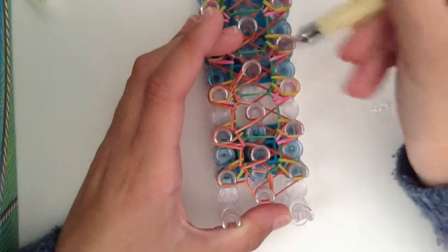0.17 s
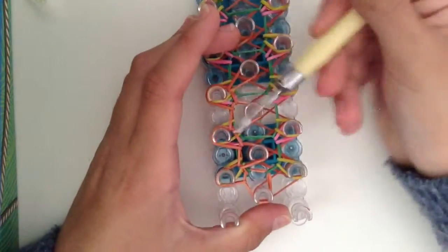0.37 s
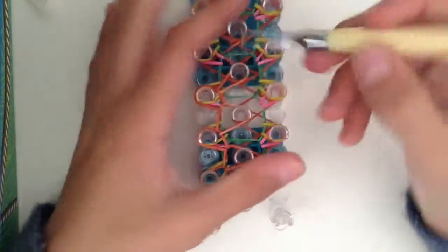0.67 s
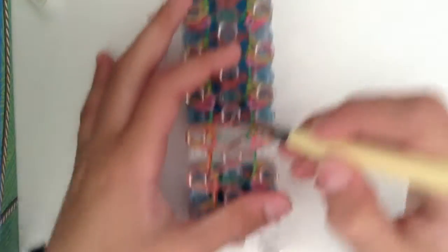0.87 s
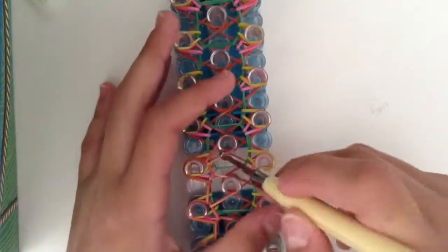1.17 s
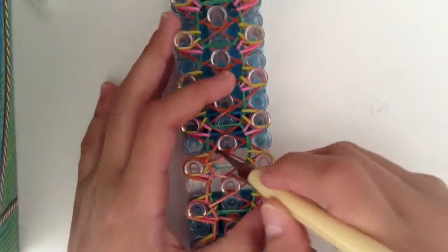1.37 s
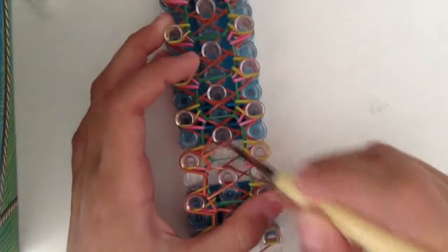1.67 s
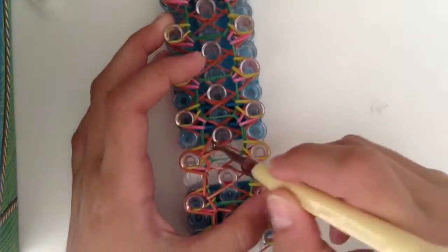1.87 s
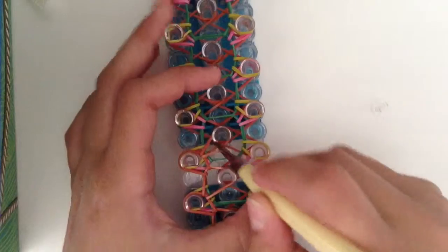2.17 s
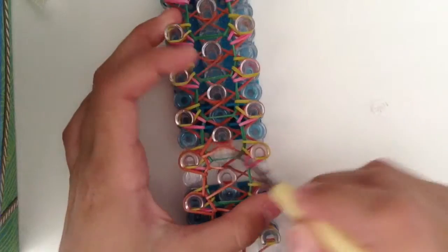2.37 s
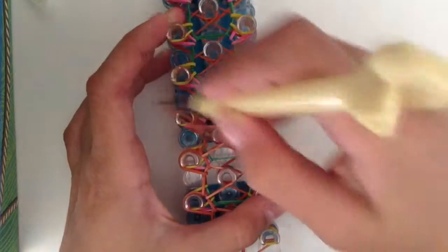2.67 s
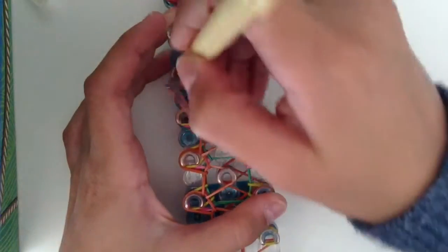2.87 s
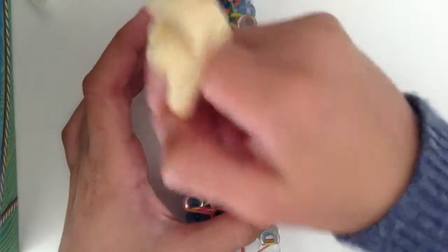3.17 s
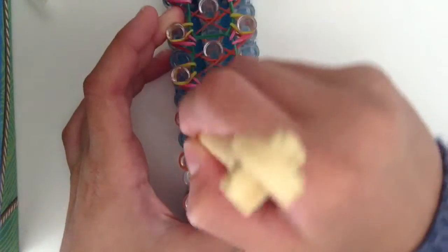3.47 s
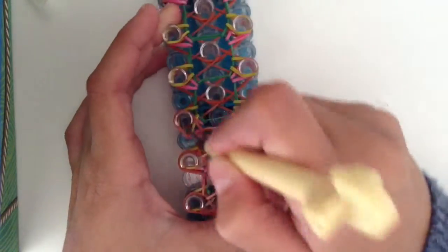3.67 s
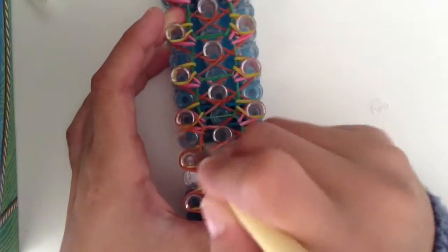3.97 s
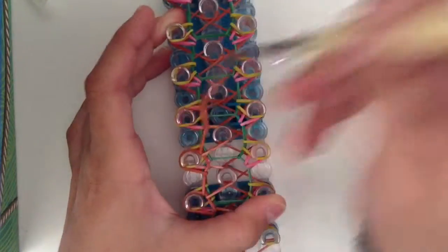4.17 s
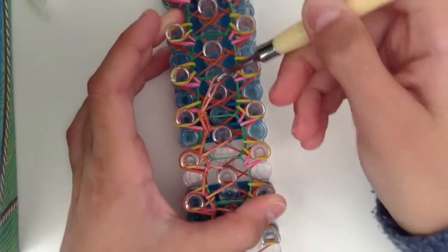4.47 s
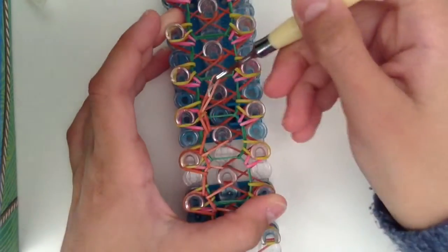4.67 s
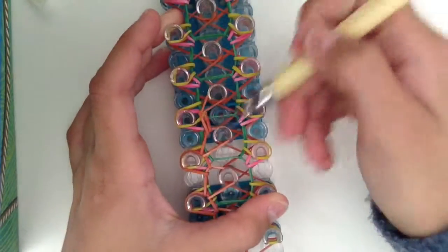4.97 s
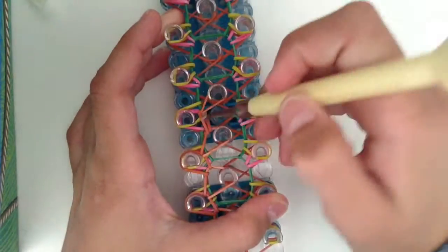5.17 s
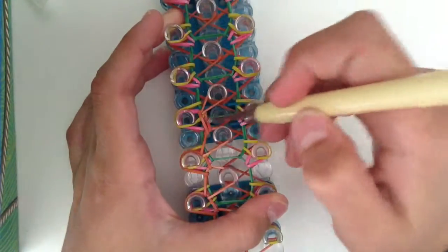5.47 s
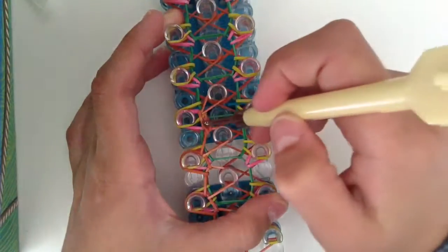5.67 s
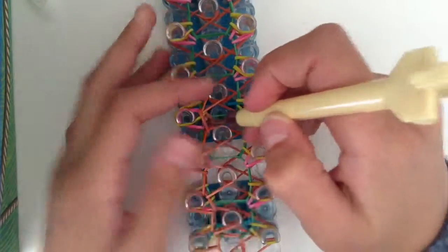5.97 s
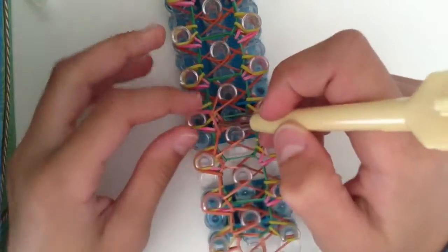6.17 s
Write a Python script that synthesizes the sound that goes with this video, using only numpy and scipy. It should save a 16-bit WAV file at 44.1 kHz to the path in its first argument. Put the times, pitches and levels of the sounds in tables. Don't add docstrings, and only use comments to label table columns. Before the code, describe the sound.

Scattered crisp plastic clicks and small table knocks as a metal hook works bands on a plastic loom, with one early uneven scrape.

```python
import sys
import numpy as np
from scipy import signal
from scipy.fft import rfft, irfft
from scipy.io import wavfile

SR = 44100
rng = np.random.default_rng(int(sys.argv[2]) if len(sys.argv) > 2 else 0)


def how_loud(loudness_db):
    steps = np.asarray(loudness_db, float) / 20
    return 10 ** steps


def materialize(psi):
    bounded = np.clip(np.atleast_2d(psi).T, -1, 1)
    quanta = np.round(bounded * 32767).astype(np.int16)
    wavfile.write(sys.argv[1], SR, quanta)


N = 278712

# pitch_hz [Hz], level_db [dB], fade by 60 dB t60_s [s]
TABLE_TONES = [(126, -30, 0.051), (177.6, -7, 0.4), (237.4, -15, 0.65), (297.3, -2, 0.17),
               (350, -2.5, 0.12), (380, 2, 0.1), (485.5, 5, 0.074), (523, -16, 0.088), (626, -6.5, 0.092),
               (665, -0.5, 0.12), (746, -4.5, 0.027), (783.5, 3, 0.064), (825.4, -1.5, 0.092)]
# pitch_hz [Hz], level_db [dB], t60_s [s]
FRAME_TONES = [(980, -5.5, 0.07), (1050, -6, 0.13), (1150, -7.5, 0.06), (1150, -5, 0.032), (1335, 3, 0.025),
               (1501, -3.5, 0.034), (1604, -6.5, 0.04), (1857, -3.5, 0.029), (2185, 1, 0.025)]
# pitch_hz [Hz], level_db [dB], t60_s [s]
PIN_TONES = [(2520, -1.5, 0.0029), (2770, -2, 0.011), (3050, -0.5, 0.011), (3250, -2.5, 0.01),
             (3450, 2, 0.0074), (4060, -3, 0.0043), (4150, -3.5, 0.03), (4324, -1, 0.012),
             (3490, -5, 0.013), (5240, 0, 0.015), (5964, -10, 0.023), (6687, -2.5, 0.017),
             (7550, 0.5, 0.008)]
# start_s [s], pins_db [dB], pin_hz [Hz], dull_crack_db [dB], bright_crack_db [dB]
PIN_SNAPS = [(0.171, -32.5, 4300, -27.5, -39), (0.191, -33, 4430, -34, -51),
             (0.3239, -22, 3700, -27, -40.5), (1.2157, -36, 3420, -57, -64),
             (1.4635, -27.5, 4420, -35, -51), (1.474, -31, 4150, -39, -57),
             (1.7845, -24.5, 4150, -33, -40.5), (2.0475, -42.5, 3530, -41.5, -71),
             (2.1679, -37, 4020, -57, -55.5), (2.6575, -11, 4770, -53, -30.5),
             (3.0522, -21, 3250, -47, -47.5), (3.11, -32.5, 4300, -53, -52), (3.24, -36.5, 3280, -48, -60),
             (3.335, -38, 4680, -30.5, -48), (3.7452, -18, 2510, -22.5, -42.5),
             (4.0781, -32, 3000, -31, -48), (4.0825, -27, 4150, -42, -42), (4.1119, -27, 3220, -31, -50),
             (4.168, -38, 4200, -38, -56), (4.6155, -43, 4000, -54, -59), (4.806, -43, 4310, -40, -53),
             (4.9189, -18, 4230, -23.5, -32.5), (5.8269, -38.5, 3050, -43, -50.5),
             (6.2262, -27, 2600, -40.5, -68)]
# start_s [s], pins_db [dB], pin_hz [Hz], frame_db [dB], crack_db [dB]
LIGHT_TICKS = [(0.456, -33, 2500, -32, -48), (0.4937, -61, 2510, -49, -49), (0.7005, -40.5, 3000, -41, -62),
               (1.4222, -60, 3520, -56.5, -67), (1.442, -47, 3370, -54.5, -53),
               (1.659, -65, 2860, -62.5, -72), (1.8539, -43.5, 4200, -56, -49), (2.31, -48, 3520, -64, -82),
               (2.386, -48, 3310, -60, -65), (2.4005, -52, 4210, -71, -55), (2.5092, -45.5, 3130, -62, -61),
               (2.8974, -43.5, 3320, -75, -72), (3.265, -37, 3470, -75, -50), (3.368, -43, 3050, -53, -59),
               (3.409, -58, 4200, -71, -54.5), (3.4568, -56, 4210, -61, -61),
               (3.476, -47, 4100, -58.5, -56), (3.891, -53, 4160, -59, -53), (4.854, -55, 3310, -57, -65),
               (5.776, -54, 3620, -73, -78), (5.9466, -56, 4240, -64, -51.5),
               (6.0439, -59.5, 3370, -58, -73)]
# start_s [s], frame_db [dB], frame_hz [Hz], table_db [dB], table_hz [Hz]
SNAP_JOLTS = [(0.171, -60, 940, -49, 313), (0.3244, -46, 910, -35, 570), (1.2156, -55.5, 1050, -48, 418),
              (1.4627, -54, 1040, -38.5, 380), (1.474, -43.5, 1150, -52, 400),
              (1.7846, -32.5, 1030, -35, 434), (2.0479, -57.5, 1050, -49, 390),
              (2.1673, -53.5, 964, -45, 350), (2.6579, -27.5, 1380, -30, 654),
              (3.0523, -46.5, 1090, -54, 514), (3.11, -48, 1070, -41, 550), (3.24, -53, 1230, -55, 430),
              (3.3357, -44, 1060, -38.5, 356), (3.745, -26.5, 1380, -27, 465),
              (4.0777, -39, 1290, -50, 646), (4.0815, -50, 1100, -37.5, 646), (4.1118, -39, 1380, -47, 630),
              (4.1687, -48.5, 1390, -53.5, 500), (4.6169, -55, 1314, -63, 400),
              (4.806, -54, 1320, -43, 487), (4.9194, -37.5, 1160, -31.5, 487), (3.264, -53, 1360, -52, 500),
              (2.8974, -59.5, 1360, -65, 484), (6.2257, -30, 1110, -43, 760)]


def rms_one(x):
    return x / np.sqrt(np.mean(x ** 2) + 1e-20)


def at_hz(points, hz, axis=1):
    table = np.array(points)
    return np.interp(np.log(hz + 1), np.log(table[:, 0]), table[:, axis])


def filtered(x, order, edge_hz, kind):
    return signal.sosfilt(signal.butter(order, edge_hz, kind, fs=SR, output="sos"), x)


def coloured(x, spectrum):
    cepstrum = irfft(np.log(how_loud(at_hz(spectrum, np.fft.rfftfreq(8192, 1 / SR)))))
    cepstrum[1:4096] *= 2
    cepstrum[4097:] = 0
    response = irfft(np.exp(rfft(cepstrum)))
    return signal.fftconvolve(x, response / np.sqrt(np.sum(response ** 2)))[:N]


def ring(clicks, hz, t60):
    decay = how_loud(-60 / (t60 * SR))
    turn = 2 * np.pi * hz / SR
    return signal.lfilter([0, np.sin(turn)], [1, -2 * decay * np.cos(turn), decay * decay], clicks + 1e-18)


def contact(starts, lengths, strengths, blow):
    force, chatter = np.zeros(N), rng.standard_normal(N)
    for s, length, strength in zip(starts, np.clip(lengths, .001, .08), strengths):
        i, size = int(s * SR), int(length * SR)
        u = np.arange(min(size, N - i)) / size
        rise = np.minimum(u * length / 0.00092, 1)
        burst = chatter[i:i + size] * rise * (1 - 0.83 * u)
        force[i:i + size] += strength * rms_one(burst) * np.sqrt((1 - blow) / size)
        force[i + 30] += strength * np.sqrt(blow) * np.sign(chatter[i])
    return force


def body(modes, starts, lengths, level_db, near_hz, focus_db, blow):
    hz, mode_db, t60 = np.transpose(modes)
    octaves_away = np.abs(np.log2(hz / near_hz[:, None]))
    shares = how_loud(mode_db - np.abs(focus_db)[:, None] * octaves_away)
    shares *= how_loud(level_db)[:, None] / np.sqrt(np.sum(shares ** 2, axis=1, keepdims=True))
    out = np.zeros(N)
    for k in range(len(hz)):
        out += ring(contact(starts, lengths, shares[:, k], blow), hz[k], t60[k])
    return out


def background():
    # pitch_hz [Hz], width_hz [Hz], level_db [dB rms]
    fan_hums = [(160.4, 3.4, -74.5), (198.7, 5.6, -74)]
    # pitch_hz [Hz], level_db [dB per Hz]
    hiss_colour = [(25, -32), (60, -20), (100, -5), (130, 2), (250, -1), (350, 0), (500, -5), (1000, -8.5),
                   (2000, -10.5), (4500, -11), (9000, -12), (15500, -12)]
    motor_hz, motor_db, hiss_db = 80.6, -81, -68
    out = how_loud(hiss_db) * rms_one(coloured(rng.standard_normal(N), hiss_colour))
    for hz, width_hz, level_db in fan_hums:
        t60 = np.log(1000) / (np.pi * width_hz)
        out += how_loud(level_db) * rms_one(ring(rng.standard_normal(N), hz, t60))
    return out + how_loud(motor_db) * np.sqrt(2) * np.sin(2 * np.pi * motor_hz * np.arange(N) / SR)


def knocks():
    # start_s [s], level_db [dB], spot_hz [Hz], rattle_s [s]
    base_bumps = [(0.115, -59.5, 350, 0.019), (0.182, -40, 586, 0.058), (0.323, -24.5, 547, 0.026),
                  (0.405, -55, 770, 0.018), (0.454, -19.5, 650, 0.065), (0.484, -26, 520, 0.02),
                  (0.523, -31, 500, 0.028), (0.667, -45.5, 450, 0.013), (0.698, -27.5, 660, 0.03),
                  (0.982, -45, 438, 0.064), (1.365, -48.5, 200, 0.047), (1.654, -56.5, 770, 0.016),
                  (2.312, -53.5, 363, 0.025), (2.403, -58, 484, 0.0082), (3.064, -50, 510, 0.042),
                  (3.605, -56.5, 700, 0.017), (3.465, -56, 344, 0.021), (3.596, -47.5, 203, 0.045),
                  (4.117, -40.5, 620, 0.026), (4.605, -55.5, 400, 0.021), (4.752, -57, 383, 0.022),
                  (4.86, -60, 387, 0.018), (5.188, -58.5, 380, 0.038), (5.316, -52, 460, 0.011),
                  (5.76, -56.5, 369, 0.028), (5.825, -25.5, 676, 0.036), (5.843, -44, 200, 0.025),
                  (5.98, -50, 487, 0.035), (6.047, -37, 453, 0.036), (6.224, -23.5, 600, 0.044)]
    jolt_lag_s, jolt_s, jolt_focus_db = .002, .02, 19.5
    hits = [(s + jolt_lag_s, db, hz, jolt_s, jolt_focus_db) for s, _, _, db, hz in SNAP_JOLTS]
    for s, db, hz, rattle_s in base_bumps:
        focus_db = 9 + 0.16 * (db + 40)
        hits.append((s + .003, db, hz, rattle_s, focus_db))
    s, level_db, spot_hz, lengths, focus_db = np.transpose(sorted(hits))
    modes = TABLE_TONES + FRAME_TONES + PIN_TONES[:6:2]
    return body(modes, s, lengths, level_db + 0.5, spot_hz, focus_db, blow=0.38)


def cracks():
    # pitch_hz [Hz], level_db [dB per Hz]
    tip_colour = [(2940, -26), (5000, -13), (5340, -7), (6100, -12), (6550, -7.5), (10600, -15),
                  (14100, -9.5), (15500, -20.5)]
    lag_s, tick_bright_db = .0006, -10
    events = [(row[0] + lag_s, row[3], row[4]) for row in PIN_SNAPS]
    events += [(row[0] + lag_s, row[4], row[4] + tick_bright_db) for row in LIGHT_TICKS]
    s, dull_db, bright_db = np.transpose(events)
    out = np.zeros(N)
    for level_db, side in ((dull_db + 10.5, "low"), (bright_db + 23.5, "high")):
        snap = contact(s, 0.002 + 0 * s, how_loud(level_db - 0.5), blow=0)
        shiver = contact(s, 0.0091 + 0 * s, how_loud(level_db - 4.5), blow=0)
        out += filtered(snap + shiver, 4, 10000, side)
    return coloured(out, tip_colour)


def touches():
    pin_focus_db, frame_focus_db, tick_frame_hz = 16, 17, 1140
    s, pins_db, pin_hz = np.transpose(PIN_SNAPS + LIGHT_TICKS)[:3]
    pins = body(PIN_TONES, s, 0.0052 + 0 * s, pins_db - .4, pin_hz, pin_focus_db + 0 * s, blow=0.63)
    pins = filtered(pins, 2, 2300, "high")
    hits = [row[:3] for row in SNAP_JOLTS]
    hits += [(row[0], row[3], tick_frame_hz) for row in LIGHT_TICKS]
    s, frame_db, frame_hz = np.transpose(sorted(hits))
    frame = body(FRAME_TONES, s + 0.0011, 0.0076 + 0 * s, frame_db + 4.5, frame_hz,
                 frame_focus_db + 0 * s, blow=0.53)
    return pins + frame


def strokes():
    # time_s [s], drag_db [dB]
    push_drag = [
        (0.3, -65),
        (0.41, -63),
        (0.47, -50.5),
        (0.58, -54.5),
        (0.66, -58),
        (0.8, -47.5),
        (0.9, -50),
        (1.05, -69.5),
        (1.2, -95),
    ]
    # peak_s [s], rise_s [s], fall_s [s], skin_db [dB], loom_db [dB]
    finger_rubs = [
        (2.57, 0.27, 0.29, -65, -91),
        (3.359, .02, 0.12, -69, -67.5),
        (3.62, 0.17, 0.13, -66.5, -81),
        (3.84, .08, .1, -73, -72),
        (3.92, .08, .1, -70.5, -85),
        (5.85, 0.048, 0.042, -67, -53.5),
        (6.05, 0.083, 0.13, -84, -66.5),
    ]
    t = np.arange(N) / SR
    drag_db = np.interp(t, *np.transpose(push_drag), left=-200, right=-200)
    over_db = drag_db + 54
    loom, bands, skin = how_loud(drag_db), how_loud(-64.5 + over_db), how_loud(-61 + 0.66 * over_db)
    for s, rise, fall, skin_db, loom_db in finger_rubs:
        swell = how_loud(-23 * np.where(t < s, (t - s) / rise, (t - s) / fall) ** 2)
        loom += how_loud(loom_db) * swell
        bands += (how_loud(skin_db - 13) + how_loud(loom_db - 14)) * swell
        skin += how_loud(skin_db) * swell
    return loom, bands, skin


def sliding():
    # pitch_hz [Hz], level_db [dB per Hz]
    rustle_colour = [(1200, -2), (2000, -4.5), (3500, -6.5), (6500, -2), (9000, -5.5), (14000, -6.5),
                     (15500, -8.5)]
    loom, bands, skin = strokes()
    grains = rng.standard_normal((3, N)) * how_loud(3.2 * rng.exponential(1, (3, N)))
    drone = sum(how_loud(db) * ring(grains[0], hz, t60) for hz, db, t60 in TABLE_TONES[3:] + FRAME_TONES)
    drone = filtered(drone, 4, 330, "high")
    buzz = sum(how_loud(db) * ring(grains[1], hz, t60 / 2) for hz, db, t60 in PIN_TONES[:7])
    rustle = coloured(grains[2], rustle_colour)
    return loom * rms_one(drone) + bands * rms_one(buzz) + skin * rms_one(rustle)


def room(x):
    # pitch_hz [Hz], t60_s [s], level_db [dB]
    echo_bands = [(200, 0.38, 3), (595, 0.45, -3.5), (1190, 0.39, -1), (2200, 0.33, -3), (3220, 0.18, -2.5),
                  (4470, 0.41, -5.5), (6600, 0.22, -3), (8900, 0.25, -3.5), (13000, 0.067, -4)]
    room_db = -9
    out, white = np.zeros(N), rng.standard_normal((2, N))
    onset = np.exp(-1 / (0.00056 * SR))
    half_band = 2 ** (1 / 14)
    for k, hz in enumerate(150 * 2 ** np.arange(0, 6.7, 1 / 7)):
        edges_hz = [hz / half_band, hz * half_band]
        fade = how_loud(-120 / (at_hz(echo_bands, hz) * SR))
        energy = filtered(x, 2, edges_hz, "band") ** 2
        energy = signal.lfilter([1 - fade], [1, -fade], energy)
        energy = signal.lfilter([1 - onset], [1, -onset], energy)
        noise = rms_one(filtered(white[k % 2], 2, edges_hz, "band"))
        out += how_loud(room_db + at_hz(echo_bands, hz, axis=2)) * np.sqrt(energy) * noise
    return out


def scene():
    loom = knocks() + cracks() + touches() + sliding()
    loom = filtered(loom, 4, 128, "high")
    return (background() + loom + room(loom))[None]


def low_pass(x):
    return signal.sosfilt(signal.butter(12, 16460, fs=SR, output="sos"), x)


def record(dry):
    mix = signal.sosfilt(signal.ellip(8, .5, 32, 15350, fs=SR, output="sos"), dry)
    return low_pass(mix)


dry = scene()
out = record(dry)
materialize(out)
```